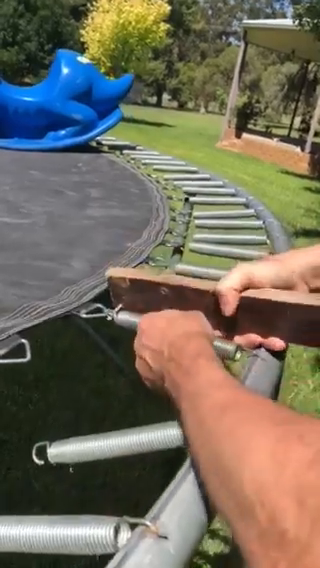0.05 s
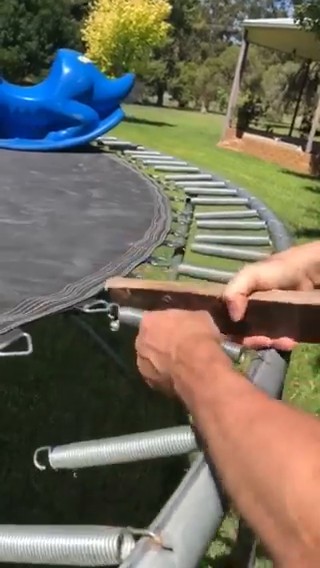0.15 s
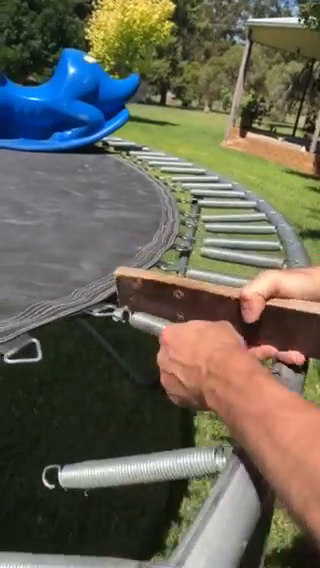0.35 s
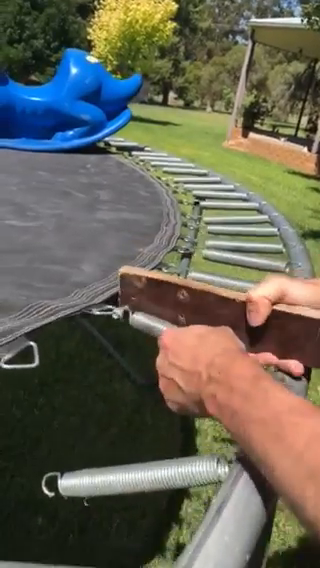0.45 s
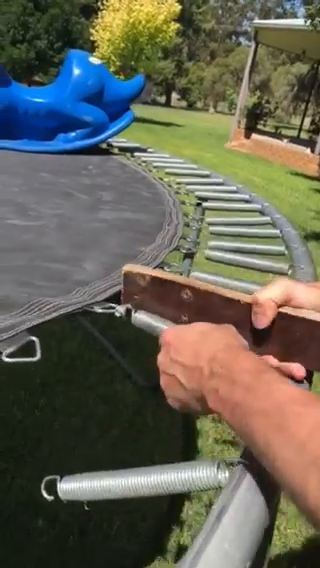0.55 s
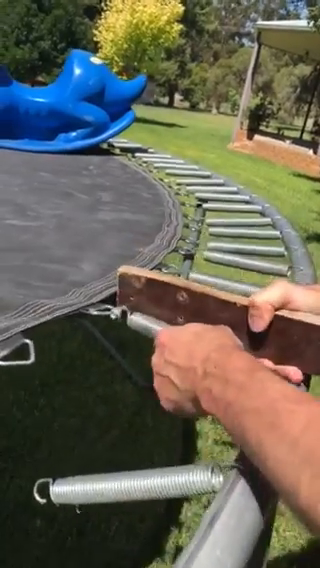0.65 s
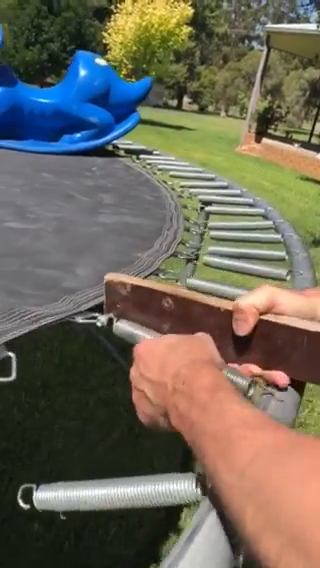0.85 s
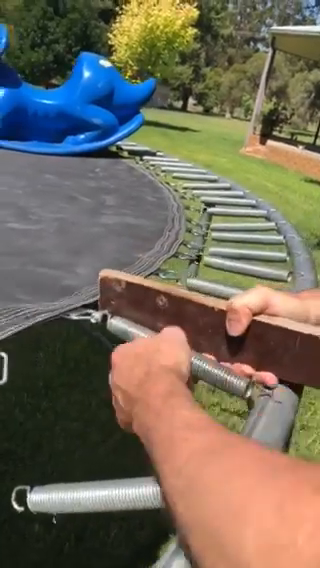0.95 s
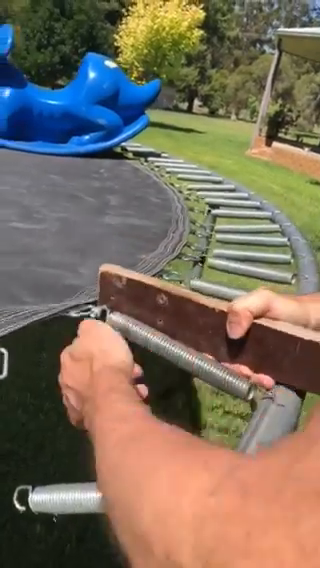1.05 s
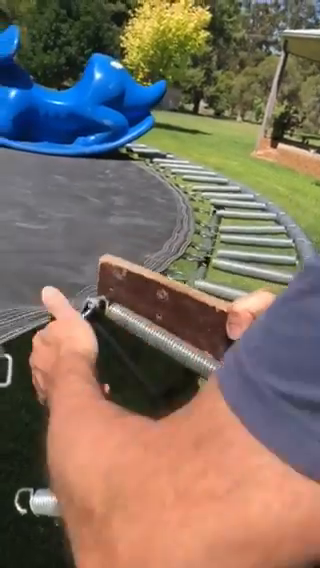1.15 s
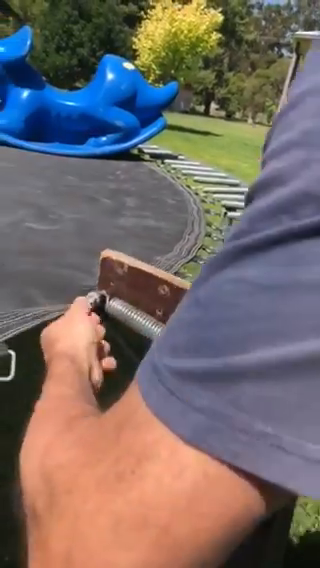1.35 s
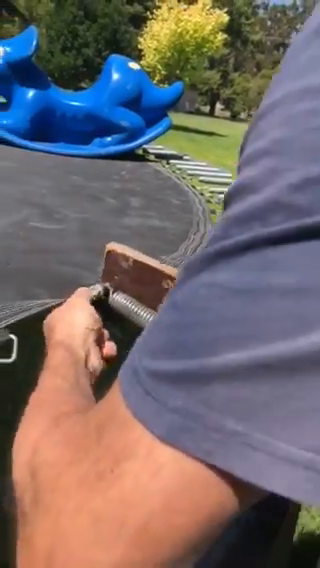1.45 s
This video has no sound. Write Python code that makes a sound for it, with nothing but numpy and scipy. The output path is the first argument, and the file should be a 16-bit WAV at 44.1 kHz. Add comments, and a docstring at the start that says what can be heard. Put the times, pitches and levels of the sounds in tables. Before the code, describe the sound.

Trampoline spring clinking and jangling as it is levered loose, buzzing afterwards, with faint birds outdoors

```python
"""Hard steel clinks, a springy jangle and a slack buzz, close by, over soft rustle and far bird notes in a garden.
A wooden tool levers a trampoline spring off its frame: hooks slip and clink, and the freed coil buzzes on.
Steel is knocks, noise bursts, decaying modes and sinking waves; the slack coil is crowded overtones and chatter.
Low thuds of steel, lever and mat are damped sines, sliding coil and rustling mat are grainy noise,
the bird is gliding sines with a noise echo, and the garden is steady coloured noise."""
import sys
import numpy as np
from scipy import signal
from scipy.fft import rfft, irfft
from scipy.io import wavfile
from scipy.ndimage import uniform_filter1d

SR = 44100
rng = np.random.default_rng(int(sys.argv[2]) if len(sys.argv) > 2 else 0)


def int16_out(signal):
    """Quantize to a 16-bit WAV file."""
    q = np.round(np.clip(np.atleast_2d(signal).T, -1, 1) * 32767)
    wavfile.write(sys.argv[1], SR, q.astype(np.int16))


N = 66150

# Slips of steel on steel: (time [s], contact time [s], longer knock [Hz], its level [dB],
# briefer knock [Hz], its level [dB], crack [dB], jangle [dB], tilt above the pivot [dB/octave], coil ring [dB])
SLIPS = [ (0.2121, 0.00097, 2090, -31, 920, -37, -38.5, -37, -10.5, -70),
         (0.2154, 0.0013, 2410, -40, 8400, -32, -59, -37, 9, -68),
         (0.2236, 0.0006, 1622, -10, 3035, -5.5, -15.5, -28.5, -2, -34.5),
         (0.3313, 0.00068, 1820, -33, 3540, -42, -35.5, -43.5, -1, -47),
         (0.3509, 0.0014, 1840, -27.5, 4220, -21, -22.5, -26.5, 4.5, -64),
         (0.3537, 0.00095, 1790, -51, 6670, -11.5, -53, -54, 5.5, -35.5),
         (0.354, 0.0036, 883, -32, 8700, -19, -37, -35.5, -8, -57),
         (1.126, 0.00054, 1170, -39, 5100, -32.5, -35, -51.5, -6, -72),
         (1.187, 0.0023, 1556, -31.5, 3480, -26.5, -34.5, -42.5, -5, -44.5),
         (1.1943, 0.0015, 1500, -57, 4380, -31, -46, -56, -5, -73),
         (1.2022, 0.0014, 1637, -20.5, 3330, -26, -29, -39, -7, -32.5),
         (1.2379, 0.00073, 1700, -49, 3580, -33, -38.5, -43, -6.5, -44),
         (1.2419, 0.0023, 3060, -37, 5150, -37.5, -52, -60, -5, -43),
         (1.248, 0.0007, 1740, -43, 5200, -36, -45, -52, -11, -63),
         (1.2523, 0.0025, 3040, -36.5, 4950, -39, -44, -46.5, -8, -43)]

TOP_HZ, MIC_LOW_CUT_HZ, STEEL_LOW_CUT_HZ = 15900, 22, 140
GARDEN_DB = -64.5
BIRD_FLUTTER_DB, BIRD_FLUTTER_PER_S = 3, 200
BIRD_ECHO_DB, BIRD_ECHO_T60_S = -4, 0.2
BUMP_PUSH_CYCLES = 0.97  # time constant of the soft onset
FREE_S, SLACK_DB, SLACK_T60_S = 1.203, -51.5, 1.58
COIL_SPACING_HZ, COIL_TOP_HZ = 87.5, 1818
SLACK_SCATTER_DB, SLACK_DETUNE = 1, 0.0118  # spreads at the top frequency; detune is a fraction
TICK_T60_S = 0.011
SNAP_CRACK_DB, SNAP_CRACK_T60_S = 3.5, 0.0041  # levels re each snap
HOOK_WASH_DB, HOOK_WASH_T60_S = -5, 0.046
KNOCK_SHARPNESS, BRIEF_KNOCK_SHARE = 1.58, 0.47  # exponent; share of the contact time
CRACK_T60_S = 0.014
JANGLE_T60_S, AFTER_T60_S, AFTER_DB = 0.09, 0.31, -19.5
RIPPLE_DB, RIPPLE_SPACING_HZ = 19, 44.86  # largest dip to peak; spacing of the coil's resonances
RING_PIVOT_HZ = 2554  # a blow's tilt acts above this
COIL_FLUTTER_DB, COIL_FLUTTER_PER_S = 4, 130
BLOOM_RETURN_S, BLOOM_RETURN_DB = 0.072, -12  # return from the far end; dB at the pivot, in proportion to Hz
BLOOM_SINK_S, BLOOM_SHARPNESS = 0.0202, 4.6  # time constant; exponent
BLOOM_BEAT_HZ, BLOOM_BEAT_DEPTH = 46, 0.43  # neighbouring modes beat


def amp(db):
    """Decibels to gain."""
    return 10 ** (np.asarray(db) / 20)


def colour_db(points, hz):
    """Read a spectrum on a log-frequency axis."""
    point_hz, db = np.array(points).T
    return np.interp(np.log(hz), np.log(point_hz), db)


def pivot_tilt_db(tilt_db, hz):
    """Treble tilt per octave above the pivot, zero below it."""
    return tilt_db * np.maximum(np.log2(hz / RING_PIVOT_HZ), 0)


def noise(points, tilt_db=0):
    """Noise of spread 1 with the given colour, its treble tilted per octave."""
    hz = np.maximum(np.fft.rfftfreq(N, 1 / SR), 1)
    gain = amp(colour_db(points, hz) + pivot_tilt_db(tilt_db, hz)) * (hz < TOP_HZ)
    y = irfft(rfft(rng.standard_normal(N)) * gain, N)
    return y / y.std()


def since(start_s):
    """Seconds since a moment, zero before it."""
    return np.maximum(np.arange(N) / SR - start_s, 0)


def fade(start_s, t60_s):
    """Sudden onset and exponential decay."""
    t = since(start_s)
    return (t > 0) * np.exp(-np.minimum(np.log(1000) * t / t60_s, 40))


def ring(start_s, hz, db, t60_s):
    """One struck mode: a decaying sine."""
    return amp(db) * fade(start_s, t60_s) * np.sin(2 * np.pi * hz * since(start_s))


def swell(curve):
    """Gain along a curve of time in s and level in dB."""
    return amp(np.interp(since(0), *np.array(curve).T))


def waver(rate_per_s):
    """Random motion of spread 1, smoothed twice over 1/rate."""
    size = int(SR / rate_per_s)
    y = uniform_filter1d(rng.standard_normal(N), size, mode="wrap")
    y = uniform_filter1d(y, size, mode="wrap")
    return y / y.std()


def flutter():
    """Turns that touch each other make a ring swell and dip."""
    return amp(COIL_FLUTTER_DB * waver(COIL_FLUTTER_PER_S))


def low_cut(x, hz):
    """Second-order high-pass."""
    return signal.sosfilt(signal.butter(2, hz, "high", fs=SR, output="sos"), x)


def glide(hz):
    """A sine that follows a frequency curve by summing its phase."""
    return np.sin(2 * np.pi * np.cumsum(hz) / SR)


def garden():
    """Steady coloured background noise."""
    # (frequency [Hz], level [dB/Hz])
    garden_colour = [(25, -7.5), (75, 12), (170, 3.5), (300, -1.5), (900, 0.5), (2500, -20.5),
                     (4500, -16.5), (8000, -17), (15500, -15)]
    return amp(GARDEN_DB) * noise(garden_colour)


def bird():
    """Distant gliding, fluttering whistles, smeared by the trees as a decaying noise echo."""
    # Notes: (time [s], length [s], start [Hz], end [Hz], level [dB])
    bird_notes = [(.01, 0.027, 2900, 4460, -61), (0.692, 0.026, 2905, 4090, -55.5),
                  (.86, 0.085, 4350, 3830, -66), (1.026, 0.041, 4980, 4630, -64.5),
                  (1.045, 0.091, 4680, 4450, -65), (1.129, 0.038, 4210, 4070, -56)]
    # Last call, bending upward: (time [s], frequency [Hz], level [dB])
    upslur = [(1.355, 2280, -63), (1.38, 2430, -56), (1.394, 3450, -51), (1.405, 4250, -58),
              (1.43, 5500, -69)]
    times_s, call_hz, call_db = np.array(upslur).T
    t = since(0)
    sounding = (t > times_s[0]) * (t < times_s[-1])
    calls = amp(np.interp(t, times_s, call_db)) * sounding * glide(np.interp(t, times_s, call_hz))
    for start_s, length_s, start_hz, end_hz, db in bird_notes:
        progress = np.minimum(since(start_s) / length_s, 1)
        calls += amp(db) * np.sin(np.pi * progress) * glide(start_hz + (end_hz - start_hz) * progress)
    calls *= amp(BIRD_FLUTTER_DB * waver(BIRD_FLUTTER_PER_S))
    trees = rng.standard_normal(N) * fade(0, BIRD_ECHO_T60_S)
    echo = signal.fftconvolve(calls, trees / np.linalg.norm(trees))[:N]
    return calls + amp(BIRD_ECHO_DB) * echo


def rubbing(grain_db=1.0, size=150):
    """Grainy friction: the coil slides over hand and tool, the stretched mat rustles."""
    # Sliding coil: (time [s], level [dB])
    slide_level = [(0, -62.5), (.12, -58.5), (.2, -60.5), (.5, -65.5), (.95, -72), (1.1, -64),
                   (1.25, -52.5), (1.34, -69.5), (1.44, -59), (1.5, -66)]
    # (frequency [Hz], level [dB/Hz])
    slide_colour = [(40, -17), (90, -13), (300, -3.5), (1000, -1), (1650, 2.5), (2300, -1), (4500, 3.5),
                    (7000, -2.5), (11000, -4.5), (15500, -3.5)]
    # Mat: (time [s], level [dB])
    mat_level = [(.2, -65.5), (.5, -61), (.62, -59.5), (.73, -55.5), (.85, -58.5), (.97, -64.5),
                 (1.1, -72.5)]
    # (frequency [Hz], level [dB/Hz])
    mat_colour = [(30, -2), (75, 10), (180, 11.5), (280, 2), (900, 2), (2000, 0.5), (2600, -4.5),
                  (4200, -3.5), (7000, -12.5), (15000, -19.5)]
    grain = uniform_filter1d(rng.standard_normal(N), size) * np.sqrt(size)
    slide = swell(slide_level) * noise(slide_colour)
    mat = swell(mat_level) * noise(mat_colour)
    return amp(grain_db * grain) * (slide + mat)


def bumps():
    """Low thuds: the body of the steel clinks, lever knocks and mat flaps, as softly pushed, damped modes."""
    # (time [s], frequency [Hz], level before the soft onset [dB], t60 [s])
    thuds = [(0.2242, 170, -36.5, 0.053), (0.224, 510, -25, 0.011), (.295, 55, -40.5, 0.14),
             (0.3565, 298, -36, 0.067), (0.23, 740, -46, 0.019), (0.366, 127, -45, 0.15),
             (0.45, 95, -44, 0.065), (0.704, 76, -30, 0.059), (1.188, 770, -28, 0.014),
             (1.2162, 1410, -30.5, .012), (1.2182, 510, -22, 0.011), (1.2235, 290, -23.5, 0.016),
             (1.5, 270, -33, .018), (1.216, 112, -34.5, 0.055)]
    out = np.zeros(N)
    for start_s, hz, db, t60_s in thuds:
        push = 1 - np.exp(-since(start_s) * hz / BUMP_PUSH_CYCLES)
        out += ring(start_s, hz, db, t60_s) * push
    return out


def slack_buzz(count=32):
    """Waves run end to end along the freed coil; their uneven overtones crowd towards a top frequency."""
    # (frequency [Hz], relative level [dB/overtone])
    overtone_colour = [(86, -11), (172, 4.5), (258, 1.5), (400, -3), (800, -3.5), (1150, 1), (1350, -20),
                       (1600, 1.5), (1850, -25)]
    overtones_hz = COIL_TOP_HZ * np.sin(np.arange(1, count + 1) * COIL_SPACING_HZ / COIL_TOP_HZ)
    t, buzz = since(FREE_S), np.zeros(N)
    for hz, (size, detune, phase) in zip(overtones_hz, rng.standard_normal((count, 3))):
        uneven = np.sqrt(hz / COIL_TOP_HZ)
        db = colour_db(overtone_colour, hz) + SLACK_SCATTER_DB * uneven * size
        detuned_hz = hz * (1 + SLACK_DETUNE * uneven * detune)
        buzz += amp(db) * np.sin(2 * np.pi * (detuned_hz * t + phase))
    return amp(SLACK_DB) * fade(FREE_S, SLACK_T60_S) * buzz / buzz[t > 0].std()


def slack_chatter():
    """Loose turns chatter against each other: fluttering coloured noise."""
    # (time [s], level before flutter [dB])
    chatter_level = [(1.19, -87), (1.22, -53.5), (1.3, -56.5), (1.35, -56.5), (1.4, -54), (1.44, -58.5),
                     (1.5, -61)]
    # (frequency [Hz], level [dB/Hz])
    chatter_colour = [(30, -20), (70, -2.5), (130, -10), (172, 7.5), (215, -1.5), (260, -17), (350, -7.5),
                      (1100, -7), (1400, -4.5), (1620, 1.5), (1830, 4.5), (1950, -12.5), (6000, -32)]
    return swell(chatter_level) * flutter() * noise(chatter_colour)


def hook():
    """The hook snaps into the mat's ring, bounces once, and ticks and scrapes lightly."""
    # Ticks and scrapes: (time [s], level [dB])
    ticks = [(0.9654, -50), (0.97, -51.5), (1.063, -48), (1.117, -45.5), (1.12, -40.5), (1.131, -38),
             (1.1473, -47), (1.176, -44), (1.3165, -45), (1.3859, -50), (1.427, -44.5), (1.451, -42.5)]
    # (frequency [Hz], level [dB/Hz])
    tick_colour = [(300, -3.5), (1500, -5), (5000, -1.5), (9000, -3), (15000, -7.5)]
    # Snap and bounce: (time [s], level [dB])
    snaps = [(0.4471, -30.5), (0.4489, -37)]
    # Hook modes: (frequency [Hz], level re snap [dB], t60 [s])
    hook_modes = [(1760, -12, 0.033), (3360, -1.5, 0.01), (4840, -1, 0.022), (5400, 7, 0.0057),
                  (6000, -5, 0.035), (9020, -16, 0.077), (9250, -12, 0.07), (10530, -9.5, 0.036)]
    # Noise wash after a snap: (frequency [Hz], level [dB/Hz])
    wash_colour = [(300, -18), (900, 6), (2500, -20), (4300, -4), (5100, 4), (6200, 13), (7300, -2),
                   (9400, 7), (10800, 7), (12500, -20), (15500, -5)]
    out = noise(tick_colour) * sum(amp(db) * fade(start_s, TICK_T60_S) for start_s, db in ticks)
    for start_s, snap_db in snaps:
        for k, (hz, db, t60_s) in enumerate(hook_modes):
            out += (-1) ** k * ring(start_s, hz, db + snap_db, t60_s)
        out += amp(snap_db + SNAP_CRACK_DB) * fade(start_s, SNAP_CRACK_T60_S) * noise(tick_colour)
        out += amp(snap_db + HOOK_WASH_DB) * fade(start_s, HOOK_WASH_T60_S) * noise(wash_colour)
    return out


def peaked(t, peak_s, sharpness):
    """Envelope that rises to 1 at its peak time and dies away."""
    return (t / peak_s * np.exp(1 - t / peak_s)) ** sharpness


def knock(start_s, hz, db, contact_s):
    """Hard-damped body resonance: the softer the contact, the later it peaks and the longer it lasts."""
    t = since(start_s)
    return amp(db) * peaked(t, contact_s, KNOCK_SHARPNESS) * np.sin(2 * np.pi * hz * t)


def slip_knocks():
    """Each slip knocks hook and frame: a longer resonance and a briefer one, usually higher, of opposite sign."""
    out = np.zeros(N)
    for start_s, contact_s, long_hz, long_db, brief_hz, brief_db, *_ in SLIPS:
        out += knock(start_s, long_hz, long_db, contact_s)
        out -= knock(start_s, brief_hz, brief_db, contact_s * BRIEF_KNOCK_SHARE)
    return out


def slip_cracks():
    """Each contact cracks: a brief burst of coloured noise."""
    # (frequency [Hz], level [dB/Hz])
    crack_colour = [(100, -31), (400, -2), (1500, -8), (4800, 0.5), (7000, -8.5), (11000, -8.5),
                    (15500, -13)]
    out = np.zeros(N)
    for start_s, *_, crack_db, _, _, _ in SLIPS:
        out += amp(crack_db) * fade(start_s, CRACK_T60_S) * noise(crack_colour)
    return out


def combed(points, count=400):
    """Break a spectrum into closely spaced resonances, more uneven towards the treble."""
    hz = RIPPLE_SPACING_HZ * np.arange(1, count + 1)
    depth_db = RIPPLE_DB * np.minimum(hz / RING_PIVOT_HZ, 1)
    return np.column_stack([hz, colour_db(points, hz) + depth_db * (rng.random(count) - 0.5)])


def coil_jangle():
    """Dense jangle of the turns: combed noise with a fast decay and a slower tail."""
    # (frequency [Hz], level before combing [dB/Hz])
    jangle_colour = [(100, -36), (280, 1.5), (550, -4.5), (1200, -3), (1800, 1.5), (2150, -6.5), (2750, -5),
                     (3000, -1.5), (4700, -6.5), (6700, 1.5), (7900, -8), (8350, 12.5), (8800, -4.5),
                     (9200, 2), (10500, -7.5), (14000, -8.5), (15500, -7)]
    jangle = combed(jangle_colour)
    out = np.zeros(N)
    for start_s, *_, jangle_db, tilt_db, _ in SLIPS:
        decay = fade(start_s, JANGLE_T60_S) + amp(AFTER_DB) * fade(start_s, AFTER_T60_S)
        out += amp(jangle_db) * decay * noise(jangle, tilt_db)
    return out


def coil_ring():
    """Modes of the coil's wire, each with its own flutter."""
    # Wire modes: (frequency [Hz])
    coil_hz = [1407, 1755, 1880, 2877, 3465, 4128, 5114, 5796, 6151, 6473, 6728, 6904, 7189, 8291, 8420,
               8475, 9001, 15462]
    # Same order: (level re blow, before flutter [dB])
    coil_db = [-16, -11.5, -11.5, -15, -17.5, -10, -6.5, -5, -10, -14, -3.5, -10, -13, -5, 0.5, -7, -3,
               -22.5]
    # Same order: (t60 [s])
    coil_t60_s = [0.11, 0.25, 0.15, 0.32, 0.22, 0.082, 0.12, 0.063, 0.073, 0.035, 0.04, .08, 0.066, .11,
                  0.025, 0.066, 0.071, .11]
    out = np.zeros(N)
    for k, (hz, mode_db, t60_s) in enumerate(zip(coil_hz, coil_db, coil_t60_s)):
        mode = np.zeros(N)
        for start_s, *_, tilt_db, ring_db in SLIPS:
            mode += ring(start_s, hz, mode_db + ring_db + pivot_tilt_db(tilt_db, hz), t60_s)
        out += (-1) ** k * flutter() * mode
    return out


def bloom(start_s, hz, above_hz, db, peak_s):
    """A dispersed wave that swells, beats, sinks in pitch and dies away."""
    t = since(start_s)
    cycles = hz * t + above_hz * BLOOM_SINK_S * (1 - np.exp(-t / BLOOM_SINK_S))
    wave = np.sin(2 * np.pi * cycles)
    wave += BLOOM_BEAT_DEPTH * np.sin(2 * np.pi * (cycles + BLOOM_BEAT_HZ * t))
    return amp(db) * peaked(t, peak_s, BLOOM_SHARPNESS) * wave


def coil_blooms():
    """Slow waves along the coil arrive late, sink onto their lowest frequency and return once."""
    # (lowest frequency [Hz])
    bloom_hz = [2884, 8290]
    # Same order: (start above lowest [Hz], level re blow [dB], time to peak [s])
    bloom_waves = [(150.3, -11, 0.036), (200, -18, 0.013)]
    out = np.zeros(N)
    for start_s, *_, tilt_db, ring_db in SLIPS:
        for hz, (above_hz, wave_db, peak_s) in zip(bloom_hz, bloom_waves):
            db = wave_db + ring_db + pivot_tilt_db(tilt_db, hz)
            return_db = db + BLOOM_RETURN_DB * hz / RING_PIVOT_HZ
            out += bloom(start_s, hz, above_hz, db, peak_s)
            out += bloom(start_s + BLOOM_RETURN_S, hz, above_hz, return_db, peak_s)
    return flutter() * out


def clinks():
    """Slipping steel under tension, its deep bass cut away."""
    steel = slip_knocks() + slip_cracks() + coil_jangle() + coil_ring() + coil_blooms()
    return low_cut(steel, STEEL_LOW_CUT_HZ)


def scene():
    """Garden behind, spring and tool in front."""
    background = garden() + bird()
    handling = rubbing() + bumps()
    spring = slack_buzz() + slack_chatter() + hook() + clinks()
    return (background + handling + spring)[None]


def record(dry):
    """Cut the deep bass gently and the top treble steeply."""
    top_cut = signal.ellip(10, 0.2, 70, TOP_HZ, fs=SR, output="sos")
    return signal.sosfilt(top_cut, low_cut(dry, MIC_LOW_CUT_HZ))


dry = scene()
out = record(dry)
int16_out(out)
```